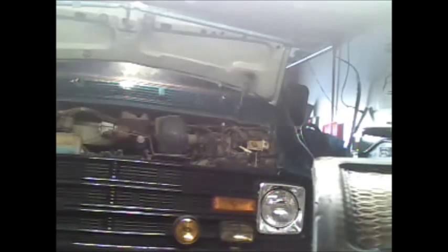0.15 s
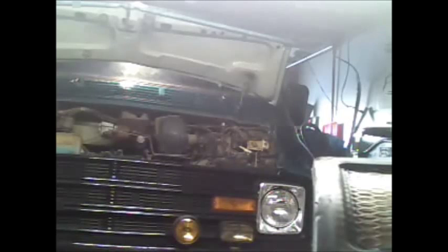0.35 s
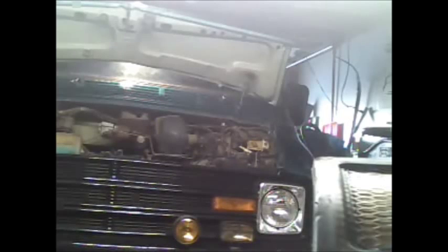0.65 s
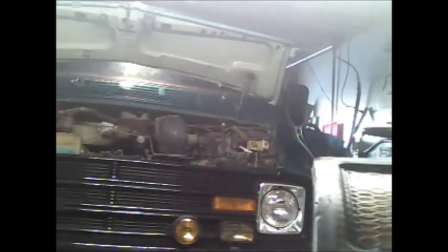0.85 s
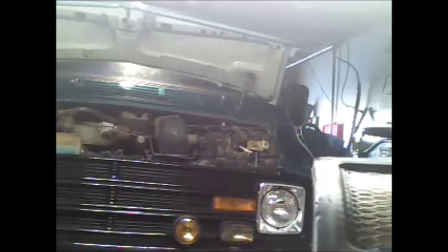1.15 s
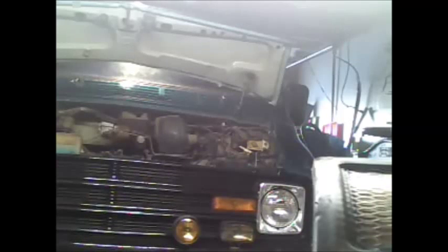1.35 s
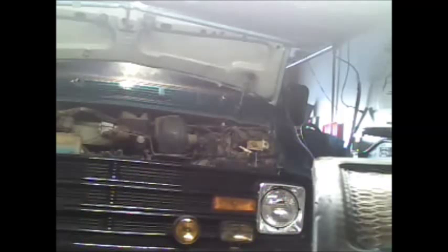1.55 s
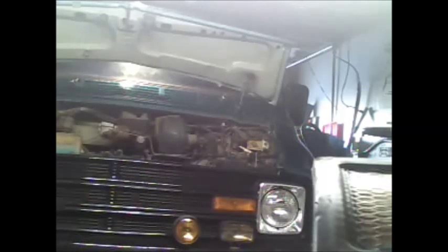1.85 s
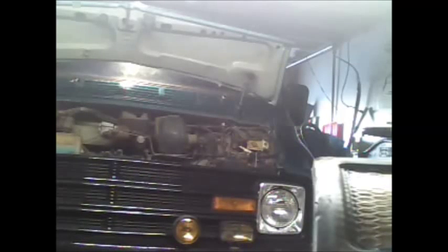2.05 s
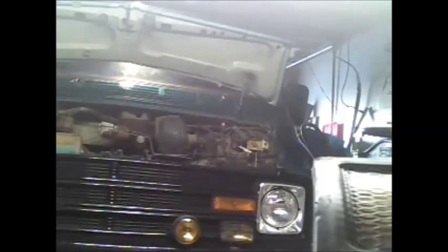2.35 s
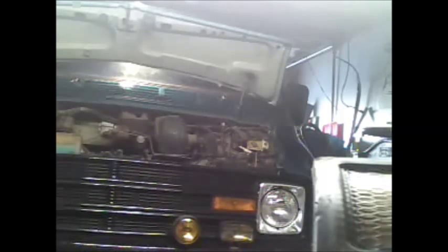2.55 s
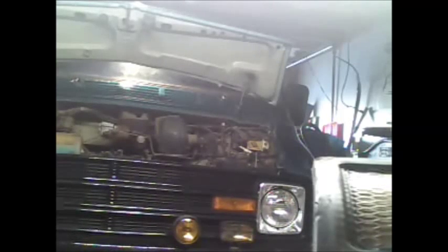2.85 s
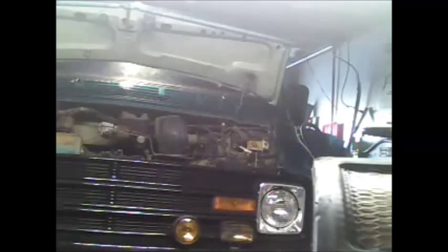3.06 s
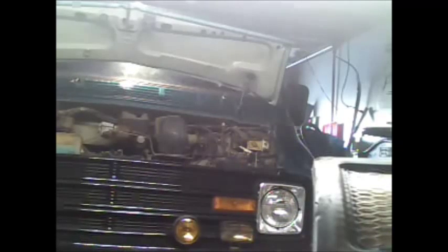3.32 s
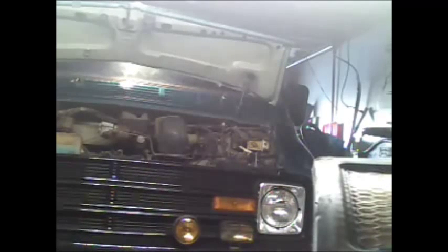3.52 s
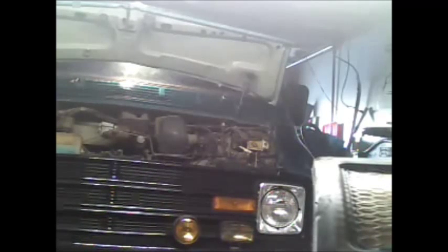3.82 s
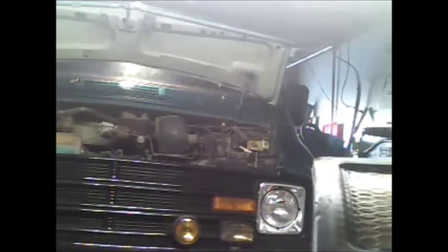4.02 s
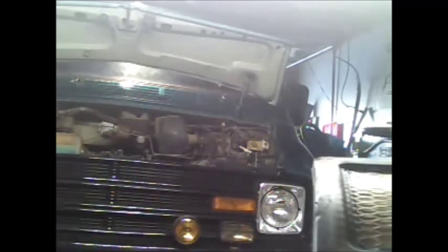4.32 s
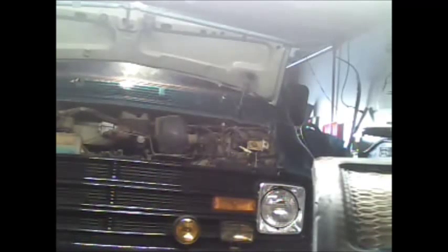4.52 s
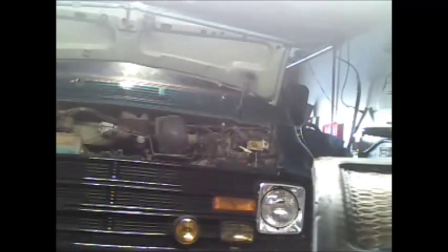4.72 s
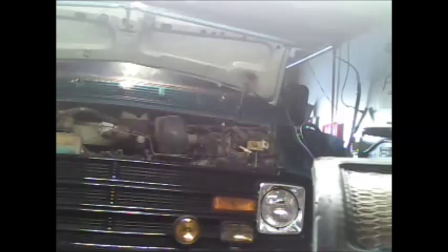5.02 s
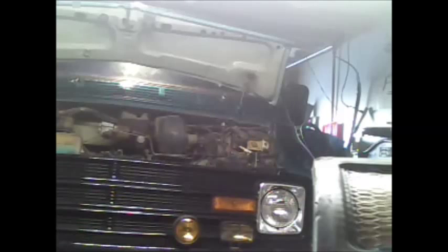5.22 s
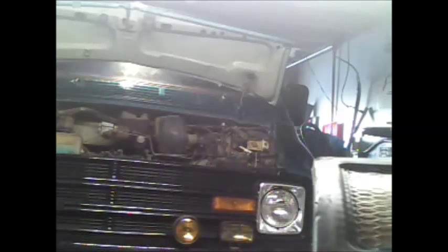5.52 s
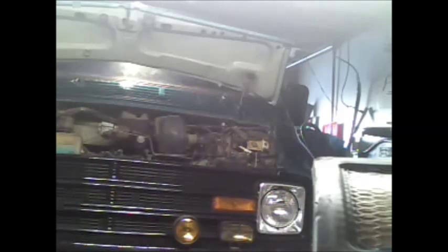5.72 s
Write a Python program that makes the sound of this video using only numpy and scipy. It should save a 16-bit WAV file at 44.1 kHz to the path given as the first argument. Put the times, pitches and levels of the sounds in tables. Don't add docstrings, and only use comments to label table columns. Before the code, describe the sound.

Close, roaring engine noise with fan wind and low exhaust throb; one stepped throttle blip, then a near-stall dip and a recovery.

```python
import sys
import numpy as np
from scipy import signal
from scipy.fft import rfft, irfft, dct, next_fast_len
from scipy.io import wavfile
from scipy.ndimage import uniform_filter1d, map_coordinates

SR = 44100
rng = np.random.default_rng(int(sys.argv[2]) if len(sys.argv) > 2 else 0)


def amp(db):
    return 10 ** (np.asarray(db, float) / 20)


def write(x):
    x = np.atleast_2d(x).T
    wavfile.write(sys.argv[1], SR, np.round(np.clip(x, -1, 1) * 32767).astype(np.int16))


N = 259308
CYLINDERS = 8
BLADES = 13.33
IDLE_HZ, IDLE_DB = 101, -28.5


def unit(x):
    return x / np.sqrt(np.mean(x ** 2) + 1e-20)


def along(points, hz):
    f, v = np.transpose(points)
    return np.interp(np.log(hz + 1), np.log(f + 1), v)


def curves(rows):
    s, *cols = np.transpose(rows)
    return [np.interp(np.arange(N) / SR, s, c) for c in cols]


def wobble(rate):
    return map_coordinates(rng.standard_normal(400), [np.arange(N) * rate / SR])


def swells(rows):
    t = np.arange(N) / SR
    return sum(db * np.exp(-((t - s) / half) ** 2) for s, half, db in rows)


def filtered(x, response):
    m = next_fast_len(N + SR // 2)
    hz = np.fft.rfftfreq(m, 1 / SR) + 1e-3
    return irfft(rfft(x, m) * response(hz), m)[..., :N]


def resonant_noise(centre_hz, width_hz, power):
    peak = lambda hz: 1 / (1 + ((hz - centre_hz) / width_hz) ** power)
    return unit(filtered(rng.standard_normal(N), peak))


def orders(cycle, table, unsteady_db, drift, rate):
    total = 0
    for multiple, db in table:
        level = amp(db + unsteady_db * wobble(rate))
        phase = drift * wobble(rate) + 2 * np.pi * rng.random()
        total = total + level * np.sin(multiple * cycle + phase)
    return total


# time_s, firing_hz, roar_db
THROTTLE = [(0, 101, -28.5), (1.3, 101.6, -28), (1.47, 127.7, -22), (1.63, 144.3, -22.5),
            (1.82, 120.5, -23.5), (2.0, 158.4, -18), (2.1, 162.6, -19.5), (2.22, 182.8, -16),
            (2.32, 196, -14.5), (2.47, 170.1, -18), (2.63, 132.1, -21.5), (2.76, 128.4, -24),
            (3.02, 108.8, -27.5), (3.4, 103.4, -27.5), (4.18, 99.44, -28), (4.4, 74.04, -34.5),
            (4.62, 76.2, -33.5), (4.74, 90.36, -30.5), (5.0, 107, -27), (5.3, 98.6, -29),
            (5.88, 95.74, -29.5)]


def throttle():
    firing_hz, roar_db = curves(THROTTLE)
    cycle = 2 * np.pi * np.cumsum(firing_hz) / SR / CYLINDERS
    speed_db = 20 * np.log10(firing_hz / IDLE_HZ)
    swell_db = roar_db - IDLE_DB
    load_db = np.minimum(swell_db - 2.51 * speed_db, 1)
    return cycle, firing_hz, swell_db, load_db


def garage(x):
    t = np.arange(SR // 3) / SR
    tail = rng.standard_normal(len(t)) * amp(-60 * t / .3) * (t > .004)
    padded = np.pad(x, (len(t), 0), mode="reflect")
    answer = signal.fftconvolve(padded, tail / np.linalg.norm(tail))[len(t):][:N]
    return (x + amp(-17) * answer) / np.hypot(1, amp(-17))


# centre_hz, width_hz, level_db
BAY_PANELS = [(322, 30, 3), (445, 35, 2), (477, 40, 2), (592, 28, 3), (700, 20, 2), (798, 40, 3),
              (935, 18, 4.5), (975, 14, 2), (1003, 20, 3.5), (1145, 30, 2), (1240, 30, 1.5), (1320, 35, 3),
              (1390, 30, 1.5), (1525, 30, 1.5), (1868, 45, 2), (3250, 70, 3), (3370, 50, 2), (3640, 80, 2),
              (4480, 90, 3)]


def bay(hz):
    return amp(sum(db / (1 + (2 * (hz - centre) / width) ** 2) for centre, width, db in BAY_PANELS))


def rush(spectrum, patchy_db):
    z = signal.stft(rng.standard_normal(N), nperseg=512)[2]
    field = uniform_filter1d(rng.standard_normal(z.shape), size=5, axis=0)
    field = uniform_filter1d(field, size=12, axis=1)
    patchy = signal.istft(z * amp(patchy_db * unit(field)), nperseg=512)[1][:N]
    return unit(filtered(patchy, lambda hz: amp(along(spectrum, hz)) * bay(hz)))


# centre_s, half_length_s, level_db
HOOTS = [
    (4.25, .07, 19),
    (4.75, .07, 14),
    (5.0, .1, 8),
]


def room_hoot():
    return amp(-53 + swells(HOOTS)) * resonant_noise(centre_hz=171.6, width_hz=7, power=2)


# centre_s, half_length_s, level_db
BUZZES = [
    (1.8, 0.14, 4),
    (2.3, 0.11, 24),
    (2.8, 0.1, 17.5),
]


def panel_buzz():
    return amp(-50 + swells(BUZZES)) * resonant_noise(centre_hz=790, width_hz=78, power=2)


# centre_hz, width_hz, level_db
HOUSING = [
    (1984, 7, 0),
    (2050, 12, -6),
]
# centre_s, half_length_s, level_db
GULPS = [(.4, 0.98, 6.5), (1.52, 0.11, 5.5), (2.04, 0.22, 14), (2.56, 0.061, -1), (2.8, 0.028, 8),
         (4.8, 0.16, 8), (5.45, 0.17, 4.5)]


def air_cleaner(cycle, swell_db):
    suction = amp(0.81 * np.sin(cycle)) * rng.standard_normal(N)
    housing = lambda f: sum(amp(db) * 1j * f * w / (c * c - f * f + 1j * f * w) for c, w, db in HOUSING)
    level_db = -42 + 0.47 * swell_db + swells(GULPS) + 1.6 * wobble(4.7)
    return amp(level_db) * unit(filtered(suction, housing))


# frequency_hz, density_db
BOOM = [(62, -44.5), (105, -5.5), (151, -12), (226, -9), (296, -5.5), (336, -5.5), (399, -14), (449, -9),
        (519, -14.5), (584, -9.5), (647, -15.5), (800, -16.5), (1040, -41.5), (1760, -120)]
# frequency_hz, density_db
ROAR = [(410, -35.5), (700, -16), (803, -3.5), (876, -3.5), (962, 1), (1300, 0), (1710, -0.5), (2040, -1),
        (2240, -4.5), (2540, -4), (3100, -18.5), (4030, -28), (4700, -40), (6820, -120)]
# frequency_hz, density_db
HISS = [(1710, -33), (2900, -2.5), (3130, -9), (3710, -6), (4020, -10), (4230, -11), (4420, -5.5),
        (4580, -7), (5140, -25.5), (5380, -15), (5770, -10.5), (6130, -15.5), (6400, -23), (6660, -60),
        (7510, -68), (16500, -120)]


def rushing_air(cycle, swell_db):
    chopped = 1 + .08 * np.sin(BLADES * cycle) + .13 * np.sin(CYLINDERS * cycle) + .08 * np.sin(3 * cycle)
    valves = 1 + 0.13 * np.sin(cycle) + 0.044 * np.sin(3 * cycle)
    roar = amp(swell_db + 0.12 * wobble(7.1)) * chopped * rush(ROAR, patchy_db=0.5)
    boom = amp(-4 + 0.95 * swell_db + 0.82 * wobble(5)) * rush(BOOM, patchy_db=1.5)
    drawn = amp(-16 + 0.85 * swell_db + 0.3 * wobble(4.6))
    steady = amp(-24)
    hiss = np.hypot(drawn, steady) * valves * rush(HISS, patchy_db=0.9)
    return amp(IDLE_DB) * (roar + boom + hiss)


def air(cycle, swell_db):
    return rushing_air(cycle, swell_db) + air_cleaner(cycle, swell_db) + panel_buzz() + room_hoot()


# multiple_of_cycle, idle_level_db
PULLEYS = [
    (9.6, -40),
    (16, -45.5),
    (19, -54.5),
    (22, -50),
    (24, -41),
]


def pulley_hum(cycle, firing_hz, load_db):
    level_db = -22 * np.abs(np.log2(firing_hz / 105)) + 0.5 * load_db
    return amp(level_db) * orders(cycle, PULLEYS, unsteady_db=3.5, drift=0.43, rate=9)


# frequency_hz, level_db
SHROUD = [(125, -56), (168, -43.5), (215, -50.5), (240, -46), (258, -34), (280, -30.5), (305, -25),
          (330, -22)]
# centre_s, half_length_s, level_db
FLUTTERS = [(1.44, .08, -10), (1.95, .05, 4.5), (2.3, 0.07, 2), (2.09, 0.059, -6), (2.53, 0.08, -13),
            (3.95, 0.1, -0.5), (4.25, 0.13, -11), (5.02, .15, -2), (5.4, 0.37, -3.5)]


def fan_blades(cycle, firing_hz, load_db):
    fan_db = along(SHROUD, firing_hz * BLADES / CYLINDERS) + 1.4 * load_db + swells(FLUTTERS)
    hum = amp(fan_db + 5) * orders(cycle, [(BLADES, 0)], unsteady_db=1.2, drift=.25, rate=16)
    whine = amp(fan_db - 3) * orders(cycle, [(4 * BLADES, 0)], unsteady_db=4, drift=.7, rate=18)
    return hum + whine


# frequency_hz, density_db
RUMBLE = [(4, -9), (15, 2), (60, 0), (95, -7.5), (120, -32)]


def burn_rumble(level_db):
    return amp(level_db - 3.5) * rush(RUMBLE, patchy_db=2.5)


# multiple_of_cycle, level_db
ROCKING = [
    (1, -4),
    (2, 3.5),
]
# centre_s, half_length_s, level_db
LURCHES = [(1.98, .06, -8), (4.65, 0.024, -7), (2.09, 0.034, 16.5), (2.36, 0.12, 14.5), (2.7, 0.049, 8),
           (2.85, 0.087, 12), (4.26, 0.054, 13), (4.45, 0.11, 10.5), (4.82, 0.075, 10), (5.08, 0.064, 0),
           (5.27, 0.071, 16)]
# centre_s, half_length_s, level_db
KICKS = [
    (1.68, 0.084, 11.5),
    (1.9, 0.039, 7.5),
    (2.38, 0.19, 0),
    (4.25, 0.067, -0.5),
]


def rocking_block(cycle, lope_db):
    lurch_db = swells(LURCHES)
    level_db = -34 + lope_db + 0.55 * lurch_db + swells(KICKS) + wobble(11.0)
    rocking = amp(level_db) * unit(orders(cycle, ROCKING, unsteady_db=3.5, drift=0.15, rate=8))
    mount_hz = 21.87
    swing = np.sin(2 * np.pi * mount_hz * np.arange(N) / SR + 0.87 * wobble(6.3))
    return rocking + amp(-39.5 + lurch_db) * swing, level_db


# multiple_of_cycle, level_db
THROB = [
    (2.998, -3),
    (3.801, 2.5),
    (4.002, -11.5),
]
# centre_s, half_length_s, level_db
THROBS = [(.65, .36, 3), (1.45, .075, 14), (1.65, .06, 4), (1.84, .052, 6), (1.98, .06, -8), (2.36, .14, 6),
          (2.7, .1, 6), (3.0, .06, 7), (4.93, .065, 5)]


def exhaust_throb(cycle, lope_db):
    level_db = -36 + lope_db + swells(THROBS) + 1.2 * wobble(5.4)
    return amp(level_db) * unit(orders(cycle, THROB, unsteady_db=2.0, drift=0.15, rate=13)), level_db


# multiple_of_cycle, level_db
BURBLE = [
    (5, 2),
    (6, -3.5),
    (7, -11),
]
# centre_s, half_length_s, level_db
BURBLES = [(.4, .51, -1), (1.47, .09, 12), (1.66, .09, 7), (1.84, .052, 9.5), (1.98, .06, -6),
           (2.1, .052, 5), (2.34, .1, 8.5), (2.7, .22, 5), (4.2, .08, 1), (5.06, .047, 3)]


def exhaust_burble(cycle, lope_db):
    level_db = -36 + lope_db + swells(BURBLES) + 2.0 * wobble(8.7)
    return amp(level_db) * unit(orders(cycle, BURBLE, unsteady_db=-0.5, drift=0.19, rate=8))


# frequency_hz, level_db
PIPE = [(75, -33), (90, -30.5), (101, -27.5), (112, -38.5), (128, -46), (147, -41.5), (158, -30),
        (172, -24.5), (197, -28)]
# centre_s, half_length_s, level_db
BURNING = [(4.35, 0.021, -4), (2.07, 0.067, -1.5), (2.21, 0.033, 4.5), (2.32, .06, -5), (4.52, 0.056, -1),
           (3.5, 0.5, -6), (2.46, 0.044, 5.5), (2.62, 0.064, -11), (3.02, 0.18, -2.5), (4.38, 0.055, -3.5),
           (4.71, 0.042, 3.5), (4.82, 0.025, -17), (4.92, 0.052, 3), (5.07, 0.12, -9), (5.3, 0.088, -6),
           (5.65, 0.2, -10)]


def firing_tone(cycle, firing_hz, load_db):
    firing_db = along(PIPE, firing_hz) + 2 * load_db + swells(BURNING)
    return amp(firing_db + 3) * orders(cycle, [(CYLINDERS, 0)], unsteady_db=1.8, drift=.22, rate=16)


def engine(cycle, firing_hz, swell_db, load_db):
    lope_db = 0.15 * swell_db
    driven = pulley_hum(cycle, firing_hz, load_db) + fan_blades(cycle, firing_hz, load_db)
    rocking, rocking_db = rocking_block(cycle, lope_db)
    throb, throb_db = exhaust_throb(cycle, lope_db)
    lope = rocking + throb + exhaust_burble(cycle, lope_db) + burn_rumble((rocking_db + throb_db) / 2)
    return driven + lope + firing_tone(cycle, firing_hz, load_db)


def scene():
    cycle, firing_hz, swell_db, load_db = throttle()
    tones = engine(cycle, firing_hz, swell_db, load_db)
    return np.tile(tones + garage(air(cycle, swell_db)), (2, 1))


def quantised(bins, step, rounding):
    return step * np.trunc(bins / step + rounding * np.sign(bins))


# frequency_hz, step_db
COARSE = [(200, -73.5), (2500, -71.5), (3300, -66.5), (4200, -62), (4700, -65.5), (5200, -65), (5600, -63),
          (6300, -64), (6600, -63)]
# frequency_hz, level_db
DIFFERENCE = [(30, -36), (200, -33.5), (500, -28), (1500, -29.5), (3000, -22.5), (6000, -13)]
SPLIT = [1.227, 2.385, 3.176, 4.766, 5.0, 5.762]
FINE_FRAMES = [1.01, 1.27, 2.2, 2.74]
# time_s, frequency_hz
STRAYS = [(.12, 7250), (.15, 6620), (2.74, 6950), (3.46, 7750), (3.54, 7620), (3.68, 7350), (3.79, 7390),
          (3.86, 7780), (4.21, 6500), (4.47, 7420), (4.61, 7330), (4.69, 6710), (4.9, 7060), (4.94, 7380),
          (5.12, 6830), (5.23, 7300), (5.37, 6400), (5.44, 6500), (5.62, 6760), (5.7, 6720), (5.77, 6760)]
HOP = 1588


def coarse_spectrum(x):
    count, h, lead = N // HOP + 3, HOP // 2, 2 * HOP - 100
    frame_at = lambda s: np.round((np.array(s) * SR + lead) / HOP).astype(int) - 1
    rise = np.cumsum(np.kaiser(HOP + 1, 4 * np.pi))
    window = np.sqrt(np.hstack([rise[:-1], rise[-2::-1]]) / rise[-1])
    padded = np.pad(np.pad(x, (0, 3 * HOP), mode="reflect"), (lead, 0))
    blocks = padded[np.arange(count)[:, None] * HOP + np.arange(2 * HOP)] * window
    a, b, c, d = np.split(blocks, 4, axis=1)
    bins = dct(np.hstack([-c[:, ::-1] - d, a - b[:, ::-1]]), type=4, norm="ortho")
    hz = (np.arange(HOP) + .5) * SR / (2 * HOP)

    power = np.mean((bins * (hz > 300)) ** 2, axis=1, keepdims=True)
    loudness_db = 10 * np.log10(uniform_filter1d(power, size=3, axis=0) + 1e-9) + 27.2
    bands_db = np.repeat(rng.standard_normal((count, HOP // 12 + 1)), 12, axis=1)[:, :HOP]
    spare_db = -3 * np.isin(np.arange(count), frame_at(FINE_FRAMES))[:, None]
    step_db = along(COARSE, hz) + 32 + .68 * loudness_db + 1.5 * bands_db + spare_db
    mid = quantised(bins, amp(step_db), rounding=.36) * (hz < 6500)
    s, stray_hz = np.transpose(STRAYS)
    mid[frame_at(s), (stray_hz * 2 * HOP / SR).astype(int)] = amp(-35)

    error = amp(along(DIFFERENCE, hz)) * np.sqrt(np.abs(uniform_filter1d(mid ** 2, size=15, axis=1))) + 1e-9
    joint = ~np.isin(np.arange(count), frame_at(SPLIT))[:, None]
    chance = rng.standard_normal(bins.shape)
    sparse = 2.2 * quantised(chance, 2.35 + hz / 22000, rounding=0)
    side = error * np.where(joint & (hz > 120), sparse, np.where(joint, .7, 2.2) * chance)

    u = dct(np.array([.993 * mid + side, mid - side]), type=4, norm="ortho")
    unfolded = [u[..., h:], -u[..., :h - 1:-1], -u[..., h - 1::-1], -u[..., :h]]
    frames = np.concatenate(unfolded, axis=2) * window
    out = frames[:, 1:, :HOP] + frames[:, :-1, HOP:]
    return out.reshape(2, -1)[:, lead - HOP:][:, :N]


def roll_off(x):
    return signal.sosfilt(signal.butter(12, 7800, fs=SR, output="sos"), x)


def record(dry):
    rounded = dry[0] / (1 + np.abs(dry[0] / 1.02) ** 4) ** (1 / 4)
    return roll_off(coarse_spectrum(rounded))


dry = scene()
out = record(dry)
write(out)
```